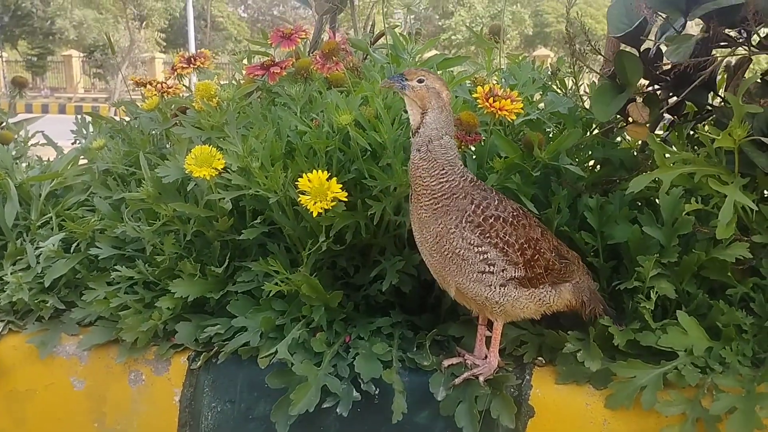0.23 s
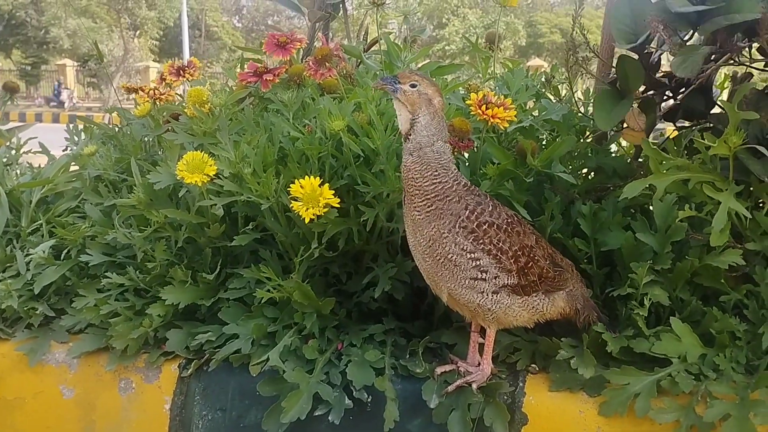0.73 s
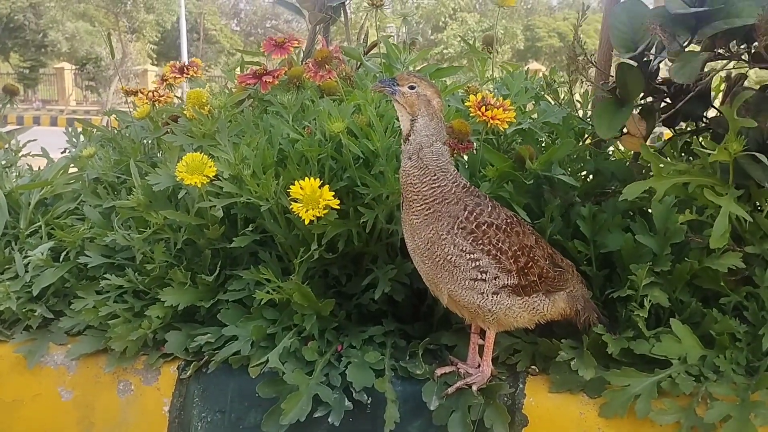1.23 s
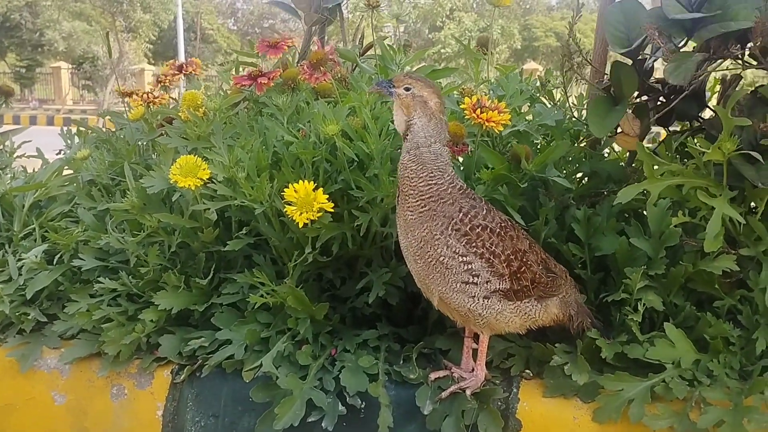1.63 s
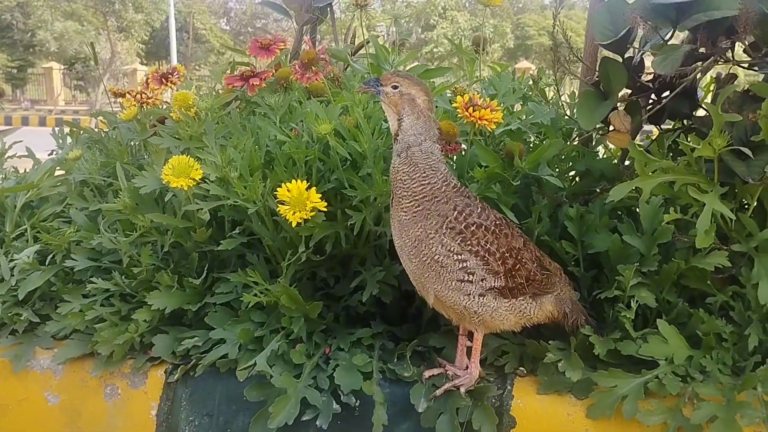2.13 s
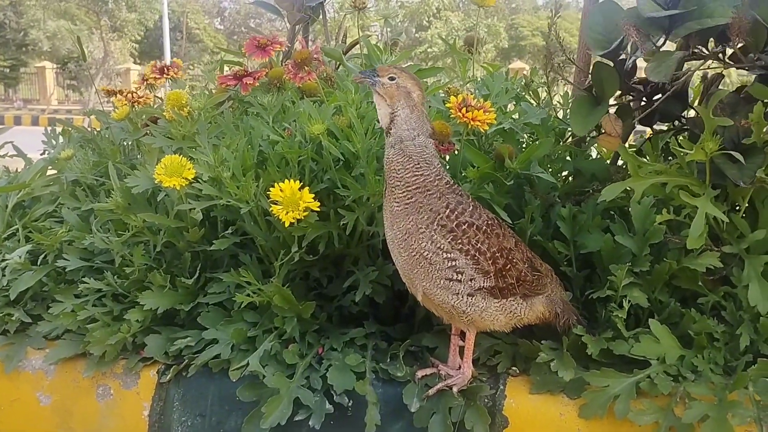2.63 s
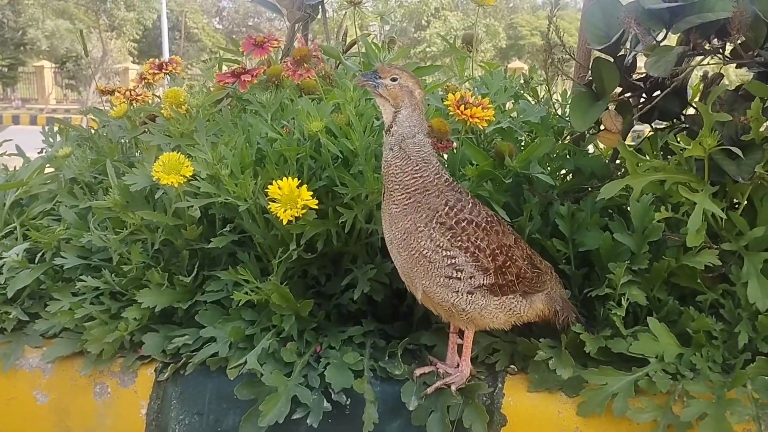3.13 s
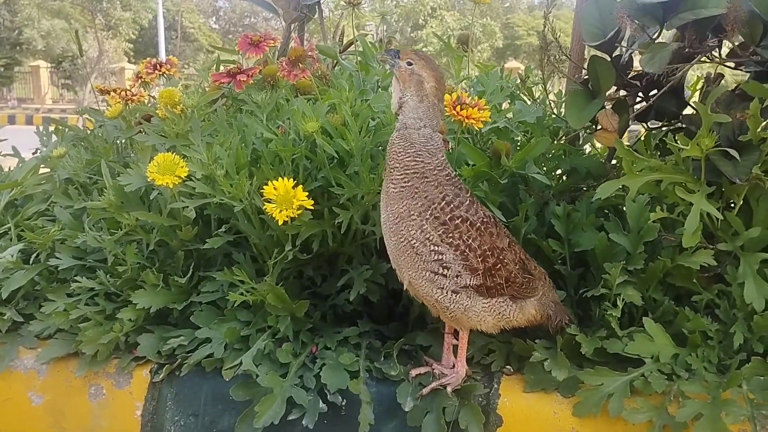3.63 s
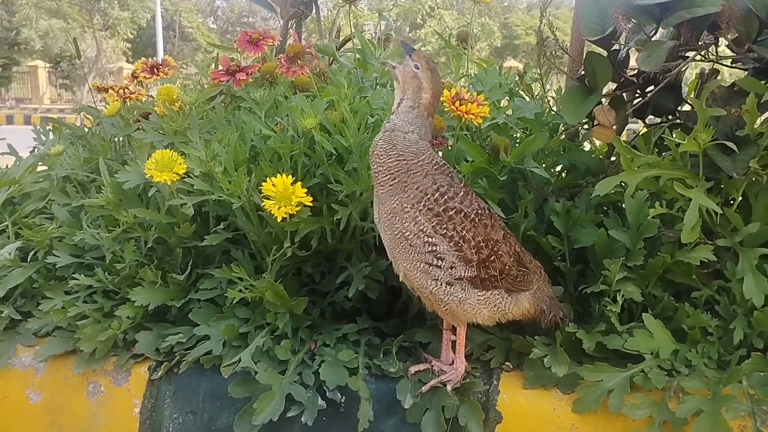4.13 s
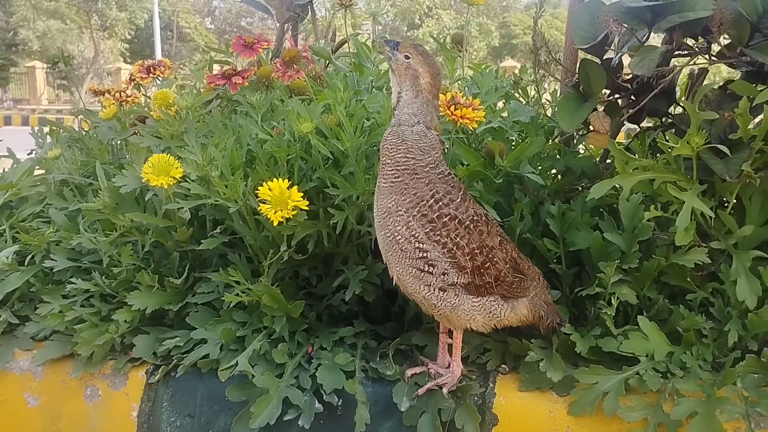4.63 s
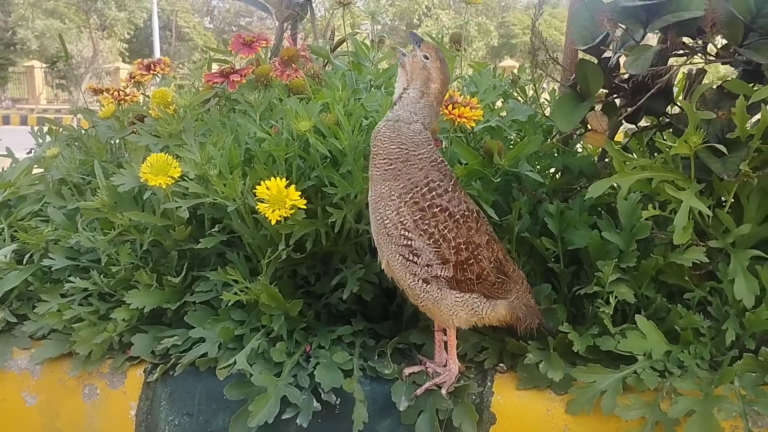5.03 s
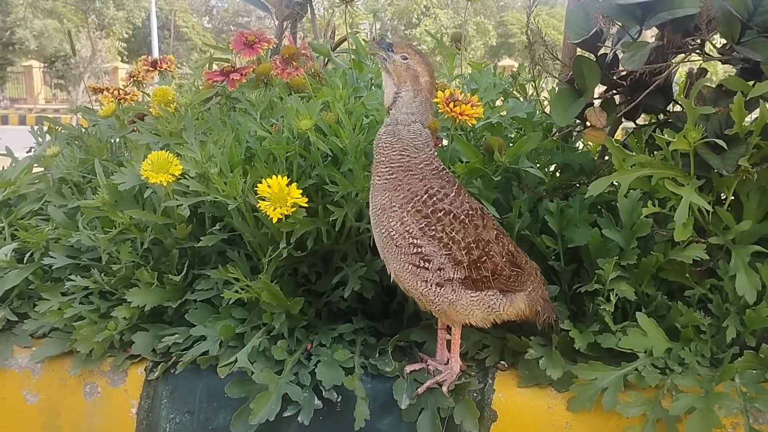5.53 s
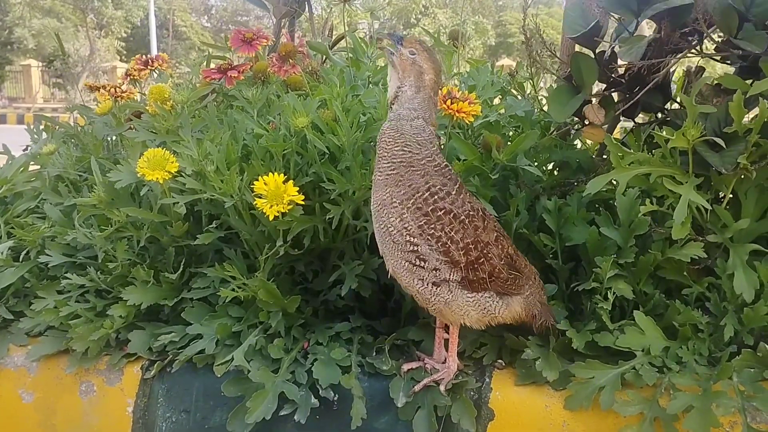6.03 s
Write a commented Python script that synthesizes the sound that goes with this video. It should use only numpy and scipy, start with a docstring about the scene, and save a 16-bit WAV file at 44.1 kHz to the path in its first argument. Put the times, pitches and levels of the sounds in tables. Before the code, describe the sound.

A low motor hum stops after a second as a francolin, close and almost straight ahead, repeats a piercing upward whistle seven times. From the left, a second bird adds raspy clucks, then loud, harsh cackles between the whistles from about halfway. The calls echo faintly off the garden. Underneath are distant traffic, a wavering engine drone, two tiny bird chips, and light wind and dull bumps on the microphones.

```python
"""A grey francolin gives seven shrill rising whistles, each a nearly pure tone with a hiss of air.
Its mate, off to the left, answers with rasping clucks and loud three-part cackles: the voice box rasps
when it beats unevenly and gives short clear notes when it locks into a steady beat. The birds echo
faintly off a garden. Behind them a small bird chips twice, a motor hums for a second, a far engine
drones and traffic rumbles over a faint hush, while a breeze and soft bumps touch the microphones."""
import sys
import numpy as np
from scipy import signal
from scipy.fft import rfft, irfft
from scipy.io import wavfile

SR = 44100
rng = np.random.default_rng(int(sys.argv[2]) if len(sys.argv) > 2 else 0)


def transcribe(u):
    """Save the signal u as a 16-bit wav file named by the first command-line argument.

    u: samples, shape (n,) or (channels, n), limited to [-1, 1]; the rate is SR.
    q: integer samples, one column per channel.
    """
    v = np.clip(np.atleast_2d(u).T, -1, 1)
    q = np.round(v * 32767).astype(np.int16)
    wavfile.write(sys.argv[1], SR, q)


N = 277389
TIME = np.arange(N) / SR
FREQS = np.fft.rfftfreq(N, 1 / SR)
TOP_HZ = 15700


def undb(db):
    """Turn decibels into a number to multiply by."""
    return 10 ** (np.asarray(db) / 20)


def curves(rows):
    """Join a table's rows with straight lines, giving each column a value at every sample."""
    times, *columns = np.transpose(rows)
    return [np.interp(TIME, times, column) for column in columns]


def lookup(points, hz):
    """Read a table at any frequency, with octaves evenly spaced."""
    freqs, values = np.transpose(points)
    return np.interp(np.log(hz + 1), np.log(freqs), values)


def unit(x):
    """Scale a signal to an average (rms) size of 1."""
    return x / np.sqrt(np.mean(x ** 2))


def colour(x, spectrum):
    """Filter x so that it rings after each push, never before; the result has size 1."""
    cepstrum = irfft(np.log(undb(lookup(spectrum, FREQS))), N)
    response = np.exp(2 * rfft(cepstrum[:N // 2], N) - cepstrum[0])
    return unit(irfft(rfft(x) * response, N))


def wobble(hz):
    """Smooth random motion of size 1, up to about hz wiggles a second."""
    noise = rng.standard_normal(int(8 * hz * N / SR) + 12)
    smooth = np.convolve(noise, signal.windows.gaussian(11, 4 / np.pi), "valid")
    return unit(np.interp(8 * hz * TIME, np.arange(len(smooth)), smooth))


def phase_of(hz):
    """Add up a changing pitch into the angle of a sine wave."""
    return 2 * np.pi * np.cumsum(hz) / SR


def gate(t, start, end, fade):
    """Fade in after start and out before end."""
    return np.sin(np.pi / 2 * np.clip(np.minimum(t - start, end - t) / fade, 0, 1))


def stereo_noise(spectrum, shared):
    """Filtered noise, partly the same in both ears."""
    noise = rng.standard_normal((3, N))
    return colour(np.sqrt(shared) * noise[0] + np.sqrt(1 - shared) * noise[1:], spectrum)


# How loud the hush is: (time [s], level [dB])
HUSH_LEVELS = [(0, -53), (1.2, -50.5), (1.9, -49), (2.6, -51.5), (6.29, -50.5)]
# Its tone colour: (frequency [Hz], level [dB])
HUSH_COLOUR = [(400, -22), (800, -16.5), (1300, -0.5), (2200, 6), (3000, 0), (4200, -4.5), (5500, -10.5),
               (7000, -15), (9000, -44), (16000, -26)]
def hush():
    """A faint, even hiss from far away."""
    db, = curves(HUSH_LEVELS)
    return undb(db + 0.4 * wobble(1.7)) * stereo_noise(HUSH_COLOUR, shared=0.39)


# How the traffic swells: (time [s], relative level [dB])
TRAFFIC_LEVELS = [(0, -34), (1.1, -37.5), (1.28, -32.5), (1.42, -39.5), (2.1, -35.5), (2.35, -49),
                  (2.52, -33.5), (3.2, -38.5), (3.55, -36), (3.7, -29), (4.27, -39.5), (4.45, -29),
                  (4.73, -28), (5.04, -43), (5.25, -30), (5.58, -33), (5.7, -40.5), (6.05, -33)]
# Its tone colour: (frequency [Hz], level [dB])
TRAFFIC_COLOUR = [(40, -11), (110, 6), (200, 3.5), (300, 3), (390, -10), (500, -4.5), (700, -16),
                  (1000, -21), (2000, -57)]
def traffic(gain_db=1):
    """Distant traffic rumbles, much alike on both sides."""
    db, = curves(TRAFFIC_LEVELS)
    return undb(db + gain_db + 2.4 * wobble(10)) * stereo_noise(TRAFFIC_COLOUR, shared=0.6)


# Gusts of wind: (time [s], relative level [dB])
GUST_LEVELS = [(0, -43.5), (.7, -32), (1.08, -34), (1.25, -21.5), (1.45, -32.5), (2.0, -31), (2.8, -31),
               (3.4, -34.5), (3.7, -29.5), (4.27, -41), (4.43, -29), (4.62, -23.5), (5.05, -35.5),
               (5.5, -32.5), (5.75, -37.5), (6.29, -35.5)]
# Their tone colour: (frequency [Hz], level [dB])
BREEZE_COLOUR = [(15, -3), (50, -1.5), (100, -2), (160, -7), (250, -24.5), (500, -31.5), (1000, -70)]
def breeze(gain_db=3.5):
    """Wind buffets each microphone mostly on its own."""
    db, = curves(GUST_LEVELS)
    return undb(db + gain_db + 3 * wobble(8.8)) * stereo_noise(BREEZE_COLOUR, shared=0.25)


# Soft bumps: (time [s], relative level [dB])
BUMPS = [(1.306, -23), (1.618, -20), (2.209, -23), (2.447, -26.5), (2.845, -26.5), (3.665, -31),
         (4.561, -24)]
# Their tone colour: (frequency [Hz], level [dB])
BUMP_COLOUR = [(20, -2.5), (80, 5), (170, -2), (280, -9), (500, -16.5), (1000, -64.5)]
def bumps(rise_s=0.0094, gain_db=5):
    """Dull bumps at the microphones swell quickly and die away."""
    size = np.zeros(N)
    for start, db in BUMPS:
        age = np.maximum(TIME - start, 0) / rise_s
        size += undb(db + gain_db) * age * np.exp(1 - age)
    return size * stereo_noise(BUMP_COLOUR, shared=0.49)


# The far engine's drone: (time [s], pitch [Hz], level [dB])
ENGINE_DRONE = [(0, 140.2, -66), (1.2, 146, -43), (2.1, 150.3, -43.5), (3.1, 149.1, -58.5),
                (3.7, 148.2, -36), (4.9, 147.8, -48), (5.4, 154.2, -34), (5.8, 150, -42),
                (6.29, 149.7, -29)]
def far_engine():
    """A wavering drone, strongest an octave above its pitch."""
    hz, db = curves(ENGINE_DRONE)
    phase = phase_of(hz * (1 + 0.01167 * wobble(10.07)))
    tone = undb(-2) * np.sin(phase) + np.sin(2 * phase) + undb(-9) * np.sin(3 * phase)
    return undb(db + 1.9 * wobble(6)) * tone


# The nearer motor's hum: (time [s], pitch [Hz], level [dB])
MOTOR_HUM = [(0.0, 132.1, -26), (.2, 134.3, -23.5), (.5, 137.7, -20), (.68, 138.3, -26.5),
             (.93, 135.8, -18.5), (1.0, 137.4, -26), (1.07, 143.3, -45)]
def motor(stop_s=1.1):
    """A low hum with two weak overtones that soon stops."""
    hz, db = curves(MOTOR_HUM)
    phase = phase_of(hz * (1 + 0.005 * wobble(24)))
    tone = np.sin(phase) + undb(-21) * np.sin(2 * phase) + undb(-28) * np.sin(3 * phase)
    return np.sqrt(2) * undb(db) * gate(TIME, -1, stop_s, .06) * tone


# Faint chips: (start [s], length [s], first pitch [Hz], last pitch [Hz], level [dB])
BIRD_CHIPS = [(0.069, 0.019, 6100, 3120, -49), (1.84, 0.018, 8300, 4700, -48.5)]
def small_bird():
    """Each chip is a high tone that slides quickly down."""
    out = np.zeros(N)
    for start, length, first_hz, last_hz, db in BIRD_CHIPS:
        hz = np.interp(TIME, [start, start + length], [first_hz, last_hz])
        out += undb(db) * gate(TIME, start, start + length, length / 2) * np.sin(phase_of(hz))
    return out


def garden_echo(x, decay_s=1.0, echo_db=-35, leaf_db=11, leaf_hz=4600, leaf_width_hz=500):
    """Plants and walls scatter a faint echo, strongest in the treble."""
    t = TIME[:SR]
    tails = rng.standard_normal((2, SR)) * undb(-60 * t / decay_s) * np.minimum(t / .012, 1)
    tails /= np.linalg.norm(tails, axis=1, keepdims=True)
    leaf_boost = undb(leaf_db * np.exp(-((FREQS - leaf_hz) / leaf_width_hz) ** 2))
    scattered = irfft(rfft(x) * leaf_boost, N)
    return undb(echo_db) * signal.fftconvolve(scattered[None], tails, axes=1)[:, :N]


# The low, middle and high ringing of the mate's throat, each: (frequency [Hz], level [dB])
LOW_RING = [(550, -32), (800, 2.5), (1000, 9.5), (1400, 11.5), (1750, -11), (2400, -59)]
MID_RING = [(1200, -21), (1700, 5.5), (2000, 7.5), (2450, -5.5), (3050, 1.5), (3500, -19.5), (4500, -50.5)]
HIGH_RING = [(2800, -23.5), (3600, -9), (4100, 9), (4700, 3), (5300, -1.5), (6000, -11), (6900, -11),
             (8000, -15), (9400, -19), (11000, -31), (13500, -18.5), (16000, -25.5)]
def rasps(bursts, onset, tail, pulse_hz=640, squeal_hz=2200, growl_hz=(1230, 930), voiced=.65):
    """The voice box beats unevenly: pulses ring the throat while a squeal and a growl stagger along."""
    gap_spread, size_spread = rng.standard_normal((N // 20, 2)).T
    hits = (np.cumsum(np.exp(.22 * gap_spread)) * SR / pulse_hz).astype(int)
    pulses = np.bincount(hits[hits < N], undb(3 * size_spread[hits < N]), N)
    breath = 0.053 * rng.standard_normal(N)
    low, mid, high = (colour(pulses + breath, ring) for ring in (LOW_RING, MID_RING, HIGH_RING))
    pulsed = np.sqrt(1 - voiced ** 2)
    phase = phase_of(squeal_hz * (1 + 0.16 * wobble(130)))
    shake = 1 + 0.39 * wobble(190)
    mid = pulsed * mid + voiced * unit(shake * np.sin(phase))
    high = pulsed * high + voiced * colour(shake * (np.sin(2 * phase) + np.sin(3 * phase)), HIGH_RING)
    stagger, throb = 1 + 0.13 * wobble(129.6), unit(1 + 0.93 * wobble(270))
    out = np.zeros(N)
    for start, peak, end, low_db, mid_db, high_db in bursts:
        on = (TIME > start) & (TIME < end)
        t = TIME[on]
        effort = np.interp(t, [start, peak, end], [onset, 1, tail]) ** 2 * gate(t, start, end, 0.0042)
        sinking_hz = np.interp(t, [peak, end], growl_hz) * stagger[on]
        growl = np.sqrt(2) * throb[on] * np.sin(phase_of(sinking_hz))
        body = undb(low_db) * (pulsed * low[on] + voiced * growl)
        edge = undb(high_db) * effort ** 0.24 * high[on]  # the high ring needs more effort
        out[on] += effort * (body + undb(mid_db) * mid[on] + edge)
    return out


# How strong a clear note's overtones are: (frequency [Hz], relative level [dB])
NOTE_COLOUR = [(1800, 1), (2800, 8), (3300, -0.5), (3800, 2.5), (4600, 8.5), (5500, -3.5), (6300, -9),
               (7200, -11.5), (8200, -17), (9400, -18), (11000, -22), (16000, -21.5)]
def clear_notes(notes, jitter, flutter, rough, rolloff_db):
    """The voice box locks into a tone for a few hundredths of a second."""
    out, waver, tremor, grit = np.zeros(N), wobble(250), wobble(200), wobble(350)
    k = np.arange(2, 13)[:, None]  # overtones are these multiples of the pitch
    for start, end, first_hz, middle_hz, last_hz, db, change_db, fade_s, bright_db in notes:
        on = (TIME > start - .001) & (TIME < end + .001)
        t = TIME[on]
        along = (t - start) / (end - start)
        window = gate(t, start - .001, end + 0.0015, fade_s + 0.0006)
        glide_hz = np.polyval(np.polyfit([0, .5, 1], [first_hz, middle_hz, last_hz], 2), along)
        hz = glide_hz * (1 + jitter * (3 - 2 * window) * waver[on])  # least steady at both ends
        phase = phase_of(hz)
        weights = undb(lookup(NOTE_COLOUR, k * hz) + rolloff_db * np.log2(k)) * (k * hz < TOP_HZ)
        overtones = np.sum(weights * np.sin(k * phase), axis=0) / np.linalg.norm(weights, axis=0)
        size = undb(db + change_db * (along - .5)) * window * (1 + flutter * tremor[on])
        out[on] += size * (np.sin(phase) + undb(bright_db) * (1 + rough * grit[on]) * overtones)
    return out


def rasp_left(notes, dip):
    """How much rasp remains while the voice box holds a clear note."""
    left = np.ones(N)
    for start, end, *_ in notes:
        on = (TIME > start) & (TIME < end)
        left[on] *= 1 - dip * gate(TIME[on], start, end, 0.0092)
    return left


# The mate's clucks:
# (tone start [s], length [s], first pitch [Hz], last pitch [Hz], rasp level [dB], tone level [dB])
MATE_CLUCKS = [(0.646, 0.059, 1512, 1085, -23.5, -17.5), (2.285, 0.065, 1621, 1254, -22, -14.5),
               (2.533, 0.043, 1165, 857, -38, -26.5), (3.667, .026, 1352, 970, -22.5, -19),
               (3.776, 0.022, 1285, 1010, -26.5, -14), (3.888, .026, 1170, 1003, -31.5, -20),
               (4.484, 0.033, 1635, 1306, -16, -6.5), (4.605, 0.026, 1546, 1298, -18.5, -7.5),
               (4.728, .03, 1424, 1126, -21.5, -9.5), (5.263, 0.026, 1800, 1446, -15, -6),
               (5.391, 0.031, 1657, 1340, -16, -6), (5.513, .028, 1576, 1277, -18, -7.5),
               (5.624, 0.028, 1554, 1315, -30.5, -16.5), (6.027, 0.027, 1870, 1748, -14, -2.5),
               (6.163, 0.031, 1690, 1306, -15.5, -5), (6.284, .03, 1696, 1380, -17.5, -3)]
# The highest clucks flip up into a second tone: (start [s], length [s], first pitch [Hz], level [dB])
CLUCK_FLIPS = [(5.285, 0.024, 1964, -12.5), (6.056, 0.021, 2040, -13.5)]
# Soft clucks that are all rasp: (start [s], length [s], low ring [dB], middle ring [dB])
SOFT_GRUNTS = [(0.05, 0.079, -41, -49), (1.615, .1, -35, -50), (2.635, 0.07, -32, -50.5),
               (3.323, 0.031, -27.5, -24), (3.97, 0.062, -24.5, -33), (4.826, .055, -22, -28)]
def clucks(usual_hz=1472, flip_fall=.12):
    """A rasp builds, locks into a falling tone and dies after it; higher clucks are brighter."""
    notes, bursts = [], []
    for start, length, hz, last_hz, rasp_db, tone_db in MATE_CLUCKS:
        end = start + length
        octaves = np.log2(hz / usual_hz)
        middle_hz = hz + .4 * (last_hz - hz)
        notes.append((start, end, hz, middle_hz, last_hz, tone_db, -2, 0.014, -15 + 10.5 * octaves))
        low_db, high_db = rasp_db - 34 * octaves, rasp_db - 10.5 + 17.5 * octaves
        bursts.append((start - 0.018, start - 0.0057, end + 0.021, low_db, rasp_db, high_db))
    for start, length, hz, db in CLUCK_FLIPS:
        glide_hz = hz, hz * (1 - flip_fall / 3), hz * (1 - flip_fall)
        notes.append((start, start + length, *glide_hz, db, -2.5, .003, -14))
    for start, length, low_db, mid_db in SOFT_GRUNTS:
        bursts.append((start, start + 0.0098, start + length, low_db, mid_db, mid_db - 14))
    tones = clear_notes(notes, jitter=.011, flutter=0.054, rough=0.49, rolloff_db=-4)
    return tones + rasp_left(notes, dip=0.41) * rasps(bursts, onset=0.31, tail=0.2)


# The mate's cackles: (middle note start [s], opening length [s], stretch of the rest [factor],
# opening level [dB], middle pitch [Hz], middle level [dB], snap level [dB],
# closing pitch [Hz], closing level [dB])
MATE_CACKLES = [(3.427, .055, 0.75, -9, 1817, -4, -9, 2202, -21),
                (4.237, .051, .95, -10.5, 1863, -3, -36.5, 2318, -20.5),
                (5.0, .049, 0.95, -10, 1890, -3.5, -18.5, 2365, -18.5),
                (5.758, .041, 1.004, -10, 2357, -8, -11, 2357, -16)]
# The first rasp, relative to the opening note: (low ring [dB], middle ring [dB], high ring [dB])
FIRST_RASP = (-20, -4, -9.5)
# Later rasps, timed from the middle note's start before stretching:
# (start [s], peak [s], end [s], low ring [dB], middle ring [dB], high ring [dB])
LATER_RASPS = [(0.021, 0.028, 0.069, -49, -25.5, -20), (0.051, 0.054, .11, -45, -27, -28),
               (.095, 0.11, 0.13, -24.5, -23, -32)]
def cackles(home_hz=1872, fall=.125):
    """A short opening note, a loud middle one, then a snap into a bright falling one, all over rasps."""
    notes, bursts = [], []
    home, octave_down = [home_hz] * 3, [home_hz / 2] * 3
    for start, lead, stretch, open_db, mid_hz, mid_db, snap_db, close_hz, close_db in MATE_CACKLES:
        def at(offset):
            return start + stretch * offset
        closing = close_hz, close_hz * (1 - .42 * fall), close_hz * (1 - fall)
        notes += [
            (start - .7 * lead, start - 0.48 * lead, *home, open_db, 3, .006, -9),
            (start - .37 * lead, start, *octave_down, -22, 3, .004, -1.5),
            (start, at(0.032), mid_hz * 1.024, mid_hz, mid_hz * 0.997, mid_db, -3.5, .008, -15),
            (at(.03), at(0.0409), *octave_down, -28, -3, .005, 3),
            (at(.053), at(0.061), home_hz, home_hz, close_hz, snap_db, -3, .003, -16),
            (at(.056), at(0.12), *closing, close_db, -13, .004, -.6)]
        bursts.append((start - lead, start - 0.65 * lead, at(0.036), *(open_db + np.array(FIRST_RASP))))
        bursts += [(at(begin), at(peak), at(end), *levels) for begin, peak, end, *levels in LATER_RASPS]
    tones = clear_notes(notes, jitter=0.0084, flutter=0.034, rough=0.2, rolloff_db=-5)
    return tones + rasp_left(notes, dip=0.77) * rasps(bursts, onset=0.42, tail=.1)


# The near bird's whistles: (start [s], length [s], pitch aimed at [Hz], last pitch [Hz],
# bend of the climb [Hz], level [dB], drop over the whistle [dB], hiss level [dB])
RISING_WHISTLES = [(0.501, 0.25, 2331, 2919, 10.5, -7, 3.5, -35),
                   (1.311, 0.23, 2355, 2853, 46, -7, 3.2, -33),
                   (2.183, 0.23, 2448, 2967, -55.5, -9, 8.9, -35.5),
                   (2.963, 0.24, 2386, 3007, -21.5, -6.5, 3.5, -32.5),
                   (3.935, 0.22, 2370, 2816, 54.5, -6.5, 4, -35),
                   (4.762, 0.22, 2450, 2870, 43.5, -7, 4.5, -33.5),
                   (5.528, 0.22, 2488, 2942, -102, -7, 9.5, -35.5)]
# Air rushing through its open bill: (frequency [Hz], level [dB])
BILL_HISS = [(900, -12), (1700, 2), (2400, 11.5), (3100, 10.5), (3700, 6.5), (4400, -3.5), (5300, 1),
             (6600, 1.5), (8100, -8.5), (9400, 4), (10200, -0.5), (11300, -15), (12600, -3.5), (16000, -14)]
def whistles(scoop_hz=200.3, scoop_s=.027, attack_s=0.021, release_s=0.033, lead_s=.028, lag_s=.046):
    """A tone starts rough and scoops up into a climb; hissing air starts before it and outlasts it."""
    tone, airflow, sizzle = np.zeros((3, N))
    waver, tremor, rough, husk, eddies = wobble(84), wobble(64), wobble(220), wobble(310), wobble(400)
    for start, length, aim_hz, last_hz, bend_hz, db, drop_db, air_db in RISING_WHISTLES:
        on = (TIME > start - lead_s) & (TIME < start + length + lag_s)
        t = TIME[on] - start
        sung = np.clip(t, 0, length)
        along = sung / length
        unsettled = 0.51 * np.exp(-np.abs(t) / 0.018)
        climb_hz = aim_hz + (last_hz - aim_hz) * along + bend_hz * np.sin(np.pi * along)
        hz = climb_hz - scoop_hz * np.exp(-sung / scoop_s)
        phase = phase_of(hz * (1 + .003 * waver[on] + 0.067 * unsettled * rough[on]))
        envelope = (1 - np.exp(-sung / attack_s)) ** 2 * gate(t, -1, length, release_s) ** 2
        flutter = 1 + 0.056 * tremor[on] + unsettled * husk[on]
        size = undb(db + drop_db * (.5 - along)) * envelope * flutter
        swell = undb(11 * np.minimum((t + lead_s) / 0.13 - 1, 0))
        tone[on] += np.sqrt(2) * size * (np.sin(phase) + undb(-33) * swell * np.sin(2 * phase))
        blowing = gate(t, -lead_s, length + lag_s, 0.057)
        # swirling air rises with the tone: a husky band just below it, a sizzling one far above
        tone[on] += undb(-33) * blowing * husk[on] * np.sin(.8 * phase)
        sizzle[on] = undb(-12) * eddies[on] * np.sin(3.55 * phase)
        airflow[on] += undb(air_db) * blowing ** 2 * swell * gate(t, -0.024, np.inf, 0.037)
    hiss = undb(wobble(50)) * airflow * (stereo_noise(BILL_HISS, shared=0.77) + sizzle)
    return tone, hiss


def place(x, left_lead, bounce_db, left_delay_s=0.002092, right_delay_s=.0029):
    """A bird reaches both microphones directly, then again as a bounce off the kerb."""
    lead = np.exp(.5j * lookup(left_lead, FREQS))
    delays = np.array([[left_delay_s], [right_delay_s]])
    bounce = undb(bounce_db) * np.exp(-2j * np.pi * FREQS * delays)
    return irfft(rfft(x) * (np.array([lead, 1 / lead]) + bounce), N)


# How far each bird's wave is ahead at the left microphone: (frequency [Hz], phase lead [rad])
MATE_LEFT_LEAD = [(500, 0), (1250, .3), (1580, 1.3), (1800, -.7), (2000, -.2), (2200, .9), (2450, .5),
                  (3100, 2.3), (3800, 2), (4600, 3.6), (6000, 7.4), (8000, 9.6), (10000, 12), (16000, 13)]
WHISTLER_LEFT_LEAD = [(1200, 0), (1700, -.6), (2300, -.2), (2750, -.6), (4000, 0), (9500, 0), (12500, -1)]
def scene(whistle_echo_db=-6, end_fade_s=0.003):
    """The whistler nearly straight ahead, its mate to the left, motors and breeze around them."""
    whistle, hiss = whistles()
    mate = (clucks() + cackles()) * gate(TIME, 0, N / SR - end_fade_s, end_fade_s)
    birds = place(whistle + hiss, WHISTLER_LEFT_LEAD, bounce_db=-33.5)
    birds += place(mate, MATE_LEFT_LEAD, bounce_db=-7.5)
    echo = garden_echo(mate + undb(whistle_echo_db) * whistle)
    return birds + echo + small_bird() + motor() + far_engine() + breeze() + traffic() + hush() + bumps()


# How much more the left microphone hears than the right: (frequency [Hz], level [dB])
MIC_BALANCE = [(60, 3.5), (150, 1), (700, 2), (1400, 1), (2400, -2), (2900, -1.8), (4400, -1), (6000, 1),
               (8100, 1), (9800, 6), (11300, 15), (13000, 13), (15500, 9)]
def record(dry):
    """Each microphone has its own tone colour, and the highest treble is cut."""
    balance_db = lookup(MIC_BALANCE, FREQS)
    gains = undb(np.array([balance_db, -balance_db]) / 2)
    heard = irfft(rfft(dry) * gains / gains.mean(axis=0), N)
    return signal.sosfilt(signal.ellip(12, .1, 80, TOP_HZ, fs=SR, output="sos"), heard)


dry = scene()
out = record(dry)
transcribe(out)
```